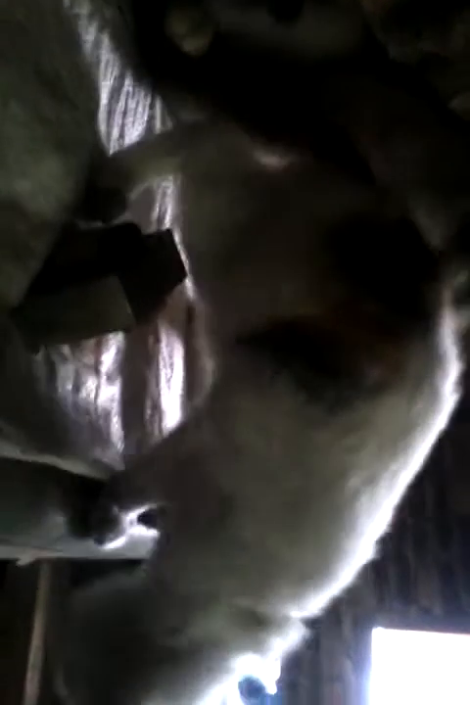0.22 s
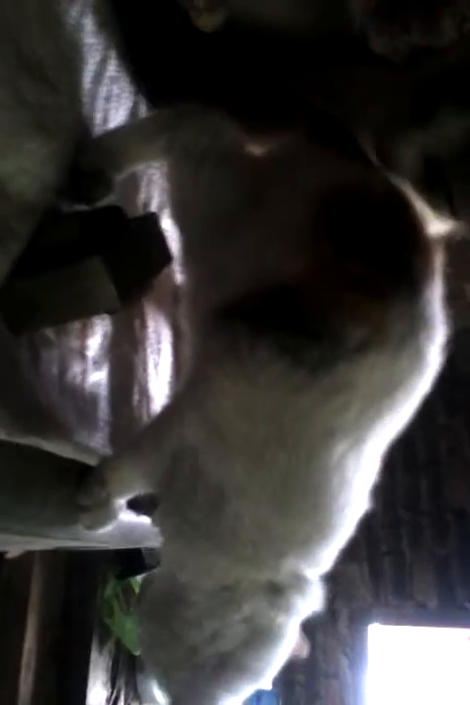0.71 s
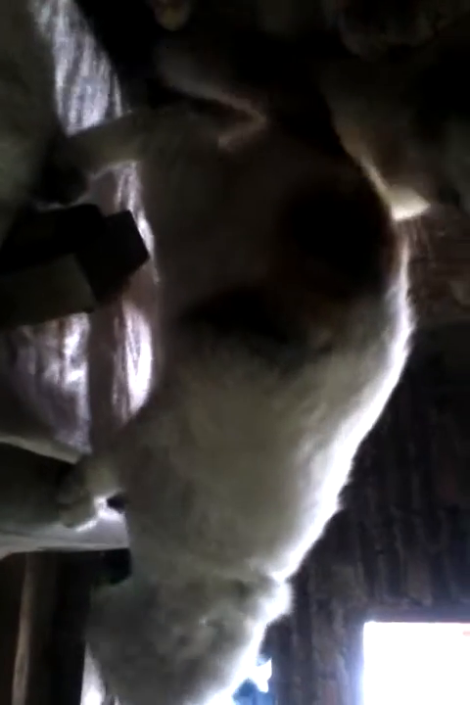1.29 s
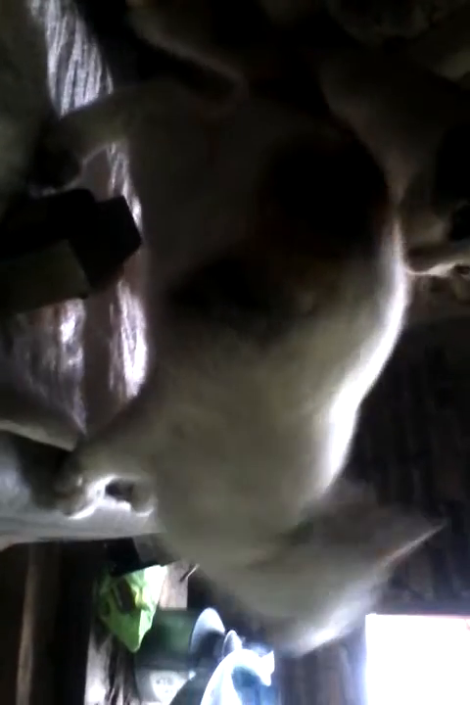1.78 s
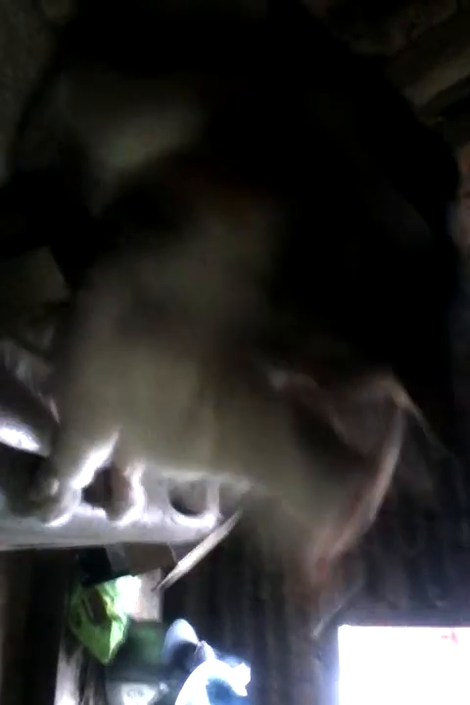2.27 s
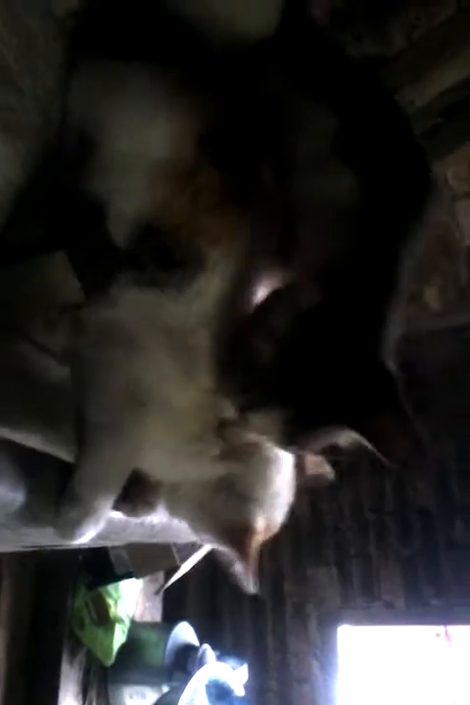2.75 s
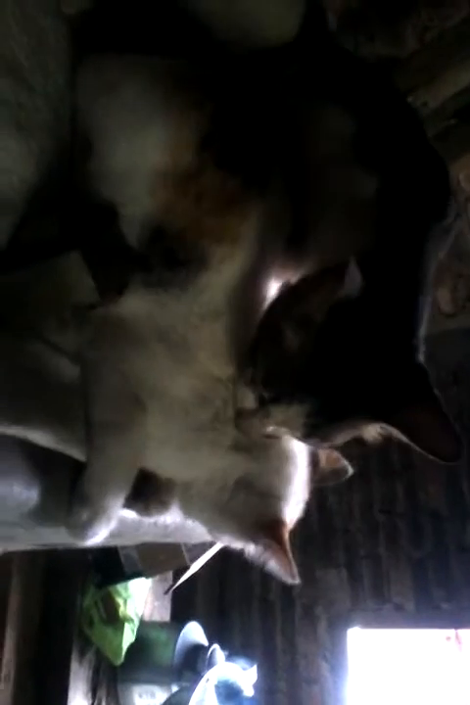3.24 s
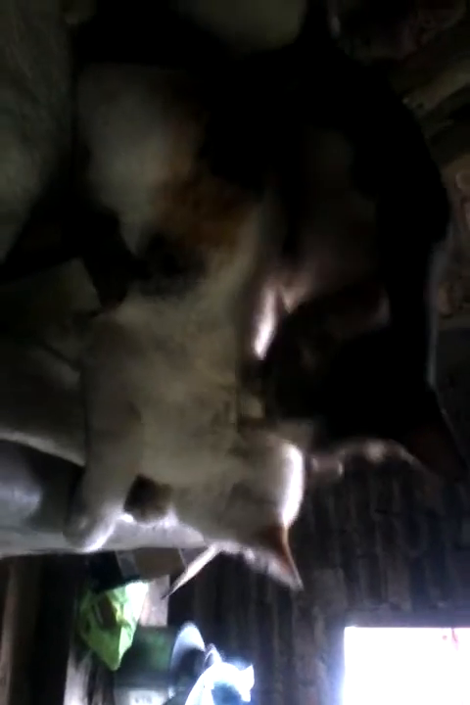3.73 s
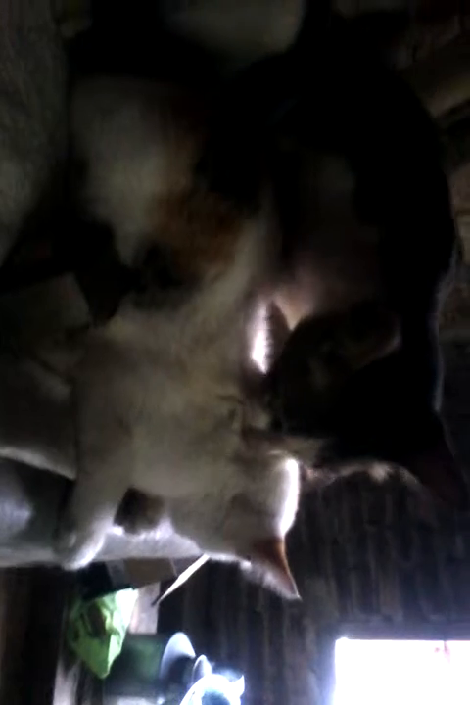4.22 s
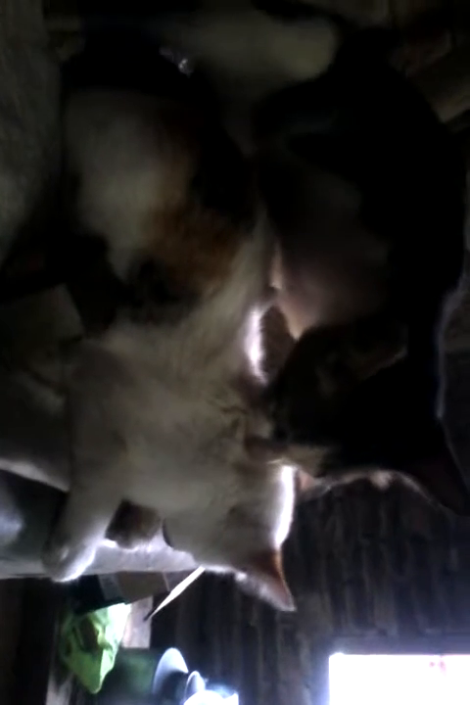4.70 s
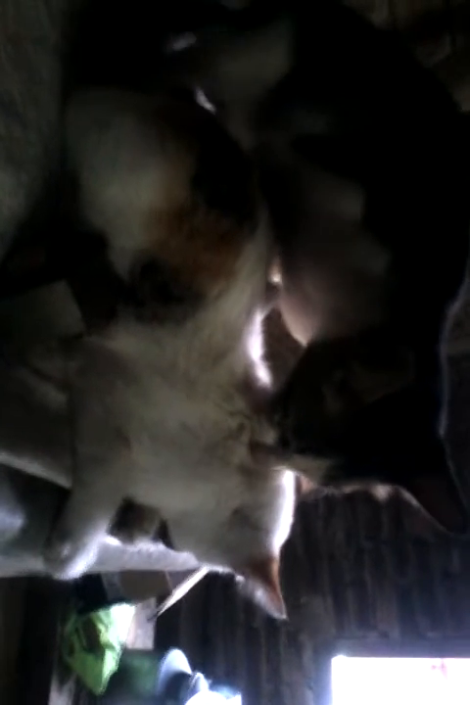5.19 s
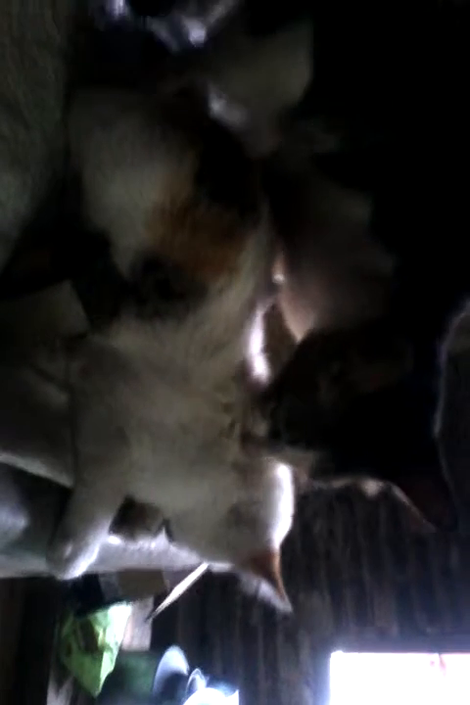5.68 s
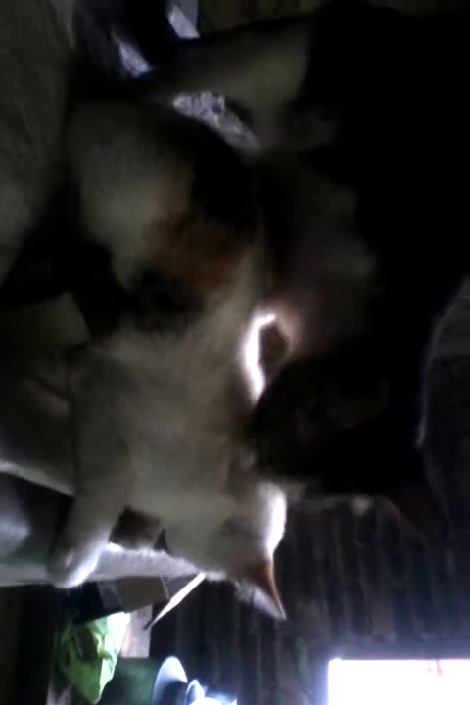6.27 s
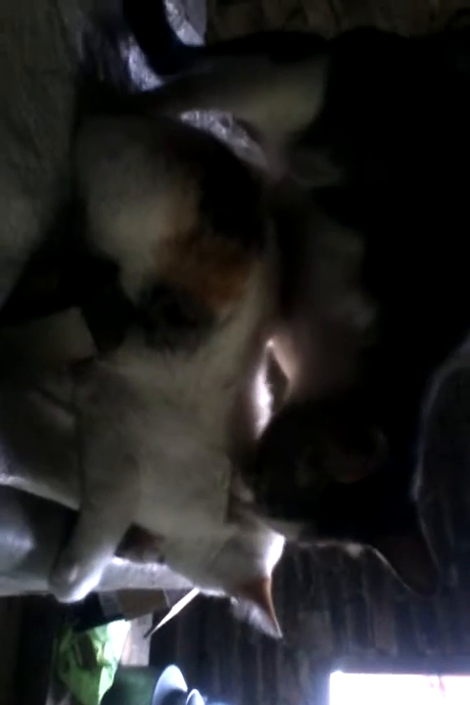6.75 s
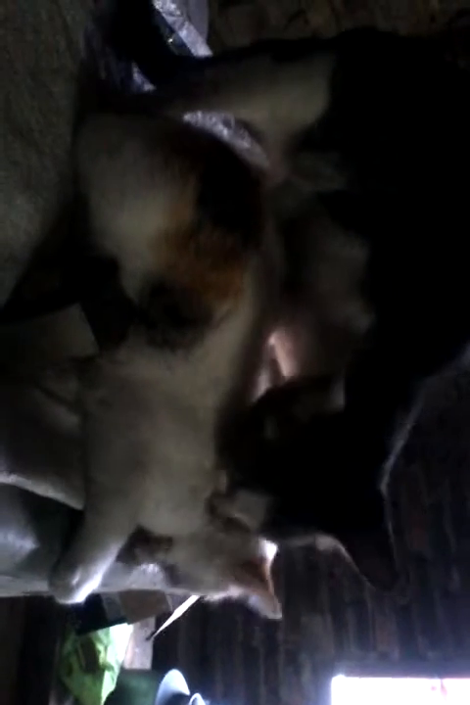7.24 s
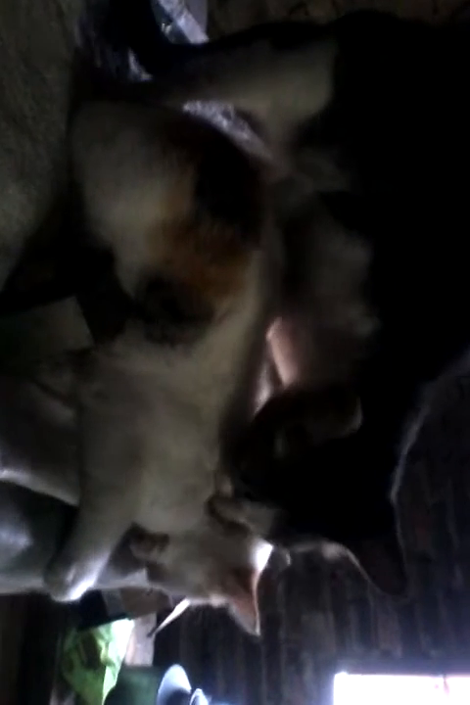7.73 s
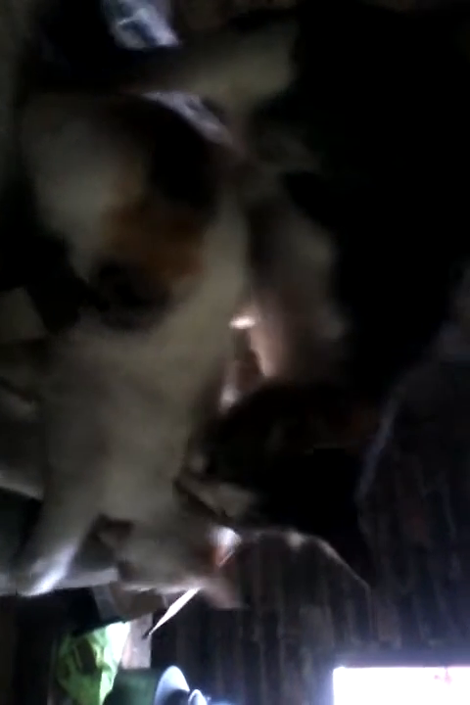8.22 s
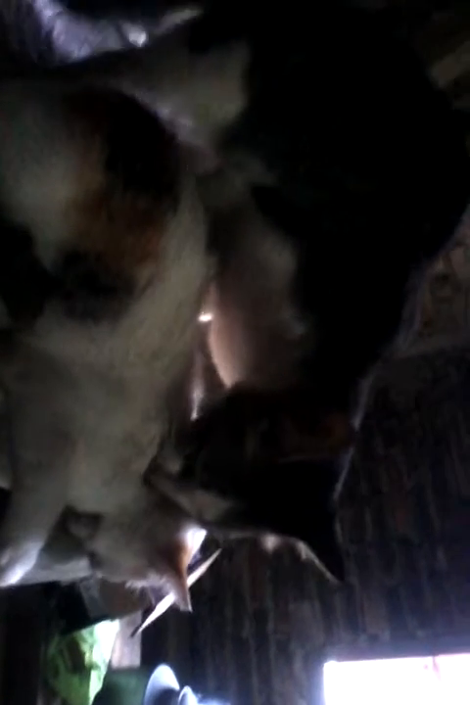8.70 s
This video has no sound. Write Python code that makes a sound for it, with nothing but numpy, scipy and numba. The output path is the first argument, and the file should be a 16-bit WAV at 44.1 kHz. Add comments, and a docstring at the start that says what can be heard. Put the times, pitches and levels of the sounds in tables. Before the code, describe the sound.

Two cats face off close to the microphone in a small room. One starts with a stuttering nasal hum that swells into a loud, wavering, raspy yowl. Much quieter closed-mouth moans follow, with a short spit early on and a faint hiss later. The moans glide up and down, cracking and crumbling into growls. A few tiny ticks and a faint room rumble lie underneath.

```python
"""Two cats face off close by in a small room. First, one swells from a stuttering nasal hum into a loud,
wavering, raspy yowl, its vocal folds ringing through nose, throat and opening mouth. Low closed-mouth
moans take over, with a short spit of unvoiced air at 2.3 s and a faint hiss near 4 s. The moans glide on,
cracking toward the octave below and crumbling into growls where the pitch sinks. A few small ticks and a
faint room rumble lie underneath; a low hum creeps up at the end."""
import sys
import numpy as np
from scipy import signal
from scipy.fft import rfft, irfft
from scipy.io import wavfile
from scipy.ndimage import uniform_filter1d
from numba import njit

SR = 44100
rng = np.random.default_rng(int(sys.argv[2]) if len(sys.argv) > 2 else 0)


def to_wav(s):
    """Save 16-bit WAV."""
    ch = np.atleast_2d(s).T  # columns
    pcm = np.round(np.clip(ch, -1, 1) * 32767)  # PCM
    wavfile.write(sys.argv[1], SR, pcm.astype(np.int16))


N = 395136
TIME = np.arange(N) / SR

# the yowl's melody, two arches: time_s, pitch_hz
YOWL_PITCH = [(.43, 334.6), (.57, 361.7), (.585, 383), (.86, 394.4), (1.014, 467.5), (1.08, 471.7),
              (1.144, 424), (1.224, 416.2), (1.26, 467), (1.366, 497.3), (1.46, 498.3), (1.506, 518.6),
              (1.564, 428.6), (1.612, 428), (1.64, 367)]
# the voice catches and its pitch dips for an instant: time_s
CATCHES = [.897, .932, .976, 1.147, 1.283, 1.335, 1.386, 1.455]
# effort steps from murmur to hum to full cry: time_s, level_db
YOWL_EFFORT = [(.41, -70), (.575, -56.5), (.59, -48), (.853, -39), (.88, -27.5), (.925, -26), (.965, -28),
               (1.02, -23.5), (1.58, -22.5), (1.618, -31.5), (1.644, -46.5)]
# pushes on top of that effort: time_s, boost_db, half_width_s
SURGES = [(1.062, 13.5, 0.036), (1.189, 7.5, 0.03), (1.389, 7.5, .045), (1.506, 14, .026)]
# the nasal hum, ducking while the jaw is wide: time_s, level_db
NASAL_LEVEL = [(0.41, -64.5), (0.568, -48), (0.582, -39), (0.981, -31.5), (1.096, -49), (1.128, -36.5),
               (1.196, -40), (1.23, -59), (1.32, -64), (1.626, -31.5), (1.645, -47)]
# the jaw stretches the mouth's resonances: time_s, frequency_ratio
JAW = [(.85, 0.66), (.885, 0.73), (.961, 0.82), (1.0, 0.93), (1.06, 1.094), (1.13, 0.91), (1.2, 0.91),
       (1.35, 1.1), (1.57, 1.036), (1.63, 0.94)]
# resonances of the yowling cat's airway: centre_hz, width_hz, gain_db
NOSE_MODES = [(400, 170, 0)]
NOSE_RING_MODES = [(2430, 200, -2), (2660, 150, -0.5), (3780, 230, -5)]
THROAT_MODES = [(955, 160, 0.00018)]
PHARYNX_MODES = [(1600, 140, -7)]
MOUTH_MODES = [(2003, 690, 1), (2278, 430, 0.97)]
SHRILL_MODES = [(6220, 1900, -5), (6580, 520, -0.5)]
# the sharp edge, one resonance climbing as the lips draw back: time_s, centre_hz
EDGE_SWEEP = [(1.0, 3800), (1.12, 4300), (1.25, 4050), (1.45, 4450)]
# the shrill top flares on the two crests of the cry: time_s, level_db
SHRILL_LEVEL = [(.93, -70), (1.005, -50), (1.05, -24), (1.085, -22.5), (1.12, -36), (1.24, -42), (1.3, -55),
                (1.42, -37), (1.468, -49), (1.502, -26), (1.53, -37.5), (1.58, -38.5), (1.645, -66.5)]
# the voice frays and air tears through: time_s, half_width_s, extra_roughness, air_db, air_hz
FRAYS = [(.65, .06, 0.18, -61, 1400), (.868, .007, 0.06, -39.5, 1820), (1.07, .022, 0, -21, 3500),
         (1.225, .025, 0.04, -33, 2600), (1.392, .02, .04, -31.5, 3900), (1.522, .016, 0, -20.5, 4250),
         (1.555, .04, .13, -27, 2900)]
# low flutter under the yowl: time_s, level_db
FLUTTER_LEVEL = [(0.52, -54), (0.966, -57.5), (1.07, -38), (1.096, -48.5), (1.246, -40.5), (1.88, -66.5)]

# one glide per moan, with levels ahead of the moans' mix gain: start_s, length_s, attack_s, release_s,
# first_hz, last_hz, nose_db, mouth_db, level_change_db, roughness
MOANS = [(1.652, 0.29, 0.0064, 0.066, 440.7, 472, -79, -56.5, -17, 0.29),
         (2.1, 0.11, 0.023, 0.051, 465, 418, -75, -59.5, -4.5, 0.4),
         (2.4, 0.77, 0.053, 0.041, 537, 543.4, -85, -78, -1.5, 0),
         (3.373, 0.085, 0.051, 0.021, 264.2, 303.6, -67.5, -61.5, -0.5, 0.01),
         (3.453, 0.098, 0.038, 0.027, 361.6, 490.4, -75, -64.5, 2.5, 0.15),
         (3.568, 0.2, 0.067, 0.069, 399, 470.1, -89, -67, 4, 0.14),
         (3.8, 0.33, 0.05, 0.03, 636, 606, -75, -69.5, 2.5, 0.02),
         (4.19, 0.14, 0.077, 0.028, 587, 571, -63.5, -79.5, 1, 0.03),
         (4.285, .11, 0.038, .025, 591, 560, -71.5, -63.5, -5, 0.01),
         (4.36, 0.055, 0.019, 0.026, 564, 512.7, -60, -71.5, -8, 0.08),
         (4.378, 0.31, 0.021, 0.017, 510, 499, -73.5, -68.5, 11, 0.01),
         (4.658, 0.29, 0.0058, 0.03, 481.2, 404, -54.5, -50.5, -7, 0.02),
         (4.883, 0.18, .025, 0.034, 402.2, 324.2, -59, -51, -1, 0.19),
         (5.035, 0.28, 0.029, 0.16, 345.2, 149, -52, -53, -10, 0.2),
         (5.893, 0.055, 0.015, 0.027, 240.9, 229.7, -63.5, -66.5, 2, 0.25),
         (5.92, 0.13, 0.048, 0.047, 255.4, 350, -55.5, -97, 1.5, 0.09),
         (5.988, .24, 0.026, 0.048, 314, 556.6, -63.5, -57.5, -5.5, 0.12),
         (6.401, 0.14, 0.051, 0.032, 538.7, 513, -66, -61, -1, 0.16),
         (6.498, .2, 0.042, 0.048, 548, 492.4, -72, -58, -0.5, 0.18),
         (6.663, 0.23, 0.045, 0.036, 596.4, 616.4, -68, -64, 0, 0.29),
         (6.887, .13, 0.047, 0.056, 519.3, 485.4, -70, -63.5, 3.5, 0.29),
         (6.986, .21, 0.072, 0.12, 487, 315.4, -55.5, -59.5, 11, 0.15),
         (7.725, 0.043, 0.013, 0.018, 220.2, 203.5, -57, -62.5, -2, 0.2),
         (7.75, 0.17, .03, 0.043, 206, 364, -61, -56, 18, 0.1),
         (7.898, 0.16, 0.075, 0.1, 357.3, 548.5, -70, -52.5, -7, 0.15)]
# the thin whine swells for a moment: time_s
WHINE_SWELLS = [2.81, 3.05, 4.04]
# the voice cracks toward the octave below as cycles alternate strong and weak: time_s, depth
CRACKS = [(3.5, 0.09), (4.07, 1), (4.15, 0.05), (6.35, 0.11), (6.45, 0.93), (6.94, 0.72), (7.0, 0.02)]
# the moaning cat's lips part briefly and lift the mouth's resonance: time_s, frequency_ratio
LIPS = [(2.2, 1.04), (2.6, 1.52), (3.1, 1.36), (3.3, 1.04), (4.0, 0.86), (4.35, 1.513), (4.75, 1.29),
        (4.98, 0.88)]
# resonances with the mouth nearly closed: centre_hz, width_hz, gain_db
MOAN_NOSE_MODES = [(260, 190, 14.5), (433, 242, 15.5)]
MOAN_MOUTH_MODES = [(836.5, 470, 1)]

# envelopes of the spit and the faint later hiss: time_s, level_db
SPIT_LEVEL = [(2.27, -66), (2.315, -40.5), (2.345, -42.5), (2.41, -63)]
HISS_LEVEL = [(3.88, -77.5), (3.97, -62.5), (4.15, -78)]
# their tone colours: frequency_hz, relative_db
SPIT_COLOUR = [(200, -27), (1600, -1.5), (3400, -15), (4300, -27), (9000, -39)]
HISS_COLOUR = [(1200, -47), (1590, 0), (2300, -40)]
# small ticks, scratches and a short rustle: start_s, peak_db, ring_hz, width_hz, decay_s
TICKS = [(1.658, -43.5, 2070, 910, 0.075), (1.755, -44, 3220, 343, 0.042), (3.514, -51, 3114, 450, 0.011),
         (3.906, -42, 4080, 603, 0.0036), (5.111, -51.5, 1784, 1002, 0.0054),
         (5.229, -57, 2300, 600, 0.0099)]
# colour of the room tone: frequency_hz, relative_db
ROOM_COLOUR = [(25, -24.5), (86, -29), (129, -4), (350, -11.5), (652, -12.5), (1160, -22.5), (6000, -27.5),
               (9000, -34.5)]
# envelopes of the room tone and its low hum: time_s, level_db
ROOM_LEVEL = [(2.3, -62.5), (4.5, -69.5), (7.3, -66), (8.2, -68)]
HUM_LEVEL = [(6.8, -83), (7.3, -80.5), (8.3, -70.5)]

THROAT_BEST_HZ = 441  # the note that suits the throat best
YOWL_CLEAR_HZ, MOAN_CLEAR_HZ = 421.4, 418  # below these, the voices roughen


def yowl(nose_ring_db=-26.5, throat_follow=0.98, mouth_top_hz=2840):
    """The lead voice: a hum leaves by the nose; as the jaw opens, the mouth's resonances take over."""
    jaw, = curves(JAW)
    hz, rough = yowl_melody()
    throat_gain, mouth_gain, edge_gain, nose_gain = yowl_dynamics(hz, jaw)
    folds = larynx(hz, rough, split=0, jitter=.13, shimmer=.9, air=1.0, softness=0.62, harmonics=17)
    nose = steady(resonate(folds, NOSE_MODES))
    nose += undb(nose_ring_db) * steady(resonate(folds, NOSE_RING_MODES))
    throat = steady(resonate(folds, THROAT_MODES, (hz / THROAT_BEST_HZ) ** throat_follow))
    # the closing of the folds trembles, which shakes mostly the overtones
    tremble = undb(1.9 * wander(55))
    # a narrow mouth rings more sharply
    ring = sum(resonate(folds, [mode], jaw, jaw ** 3) * undb(2.3 * wander(55)) for mode in MOUTH_MODES)
    ring += resonate(folds, PHARYNX_MODES)
    mouth = steady(signal.sosfilt(signal.butter(8, mouth_top_hz, fs=SR, output="sos"), ring))
    rasp = folds + 2 * rough * noise()  # turbulence at the teeth
    overtones = mouth_gain * mouth + edge_gain * sharp_edge(rasp) + shrill_top(rasp)
    return nose_gain * nose + throat_gain * throat + tremble * overtones + torn_air(folds) + flutter()


def yowl_melody(catch_depth=.035, catch_half_width_s=.006):
    """Pitch and roughness: the folds catch, fray, and rasp as they slacken."""
    hz, = curves(YOWL_PITCH)
    hz *= 1 - catch_depth * sum(bump(s, catch_half_width_s) for s in CATCHES)
    fray = sum(extra * bump(s, width) for s, width, extra, _, _ in FRAYS)
    return hz, 0.11 + fray + slack(hz, YOWL_CLEAR_HZ, per_octave=0.84)


def yowl_dynamics(hz, jaw, stutter_db=5, stutter_hz=41.5, jaw_open=.89):
    """Gains of throat, mouth, edge and nose; effort and its surges drive the first three."""
    effort_db, = curves(YOWL_EFFORT)
    nose_db, = curves(NASAL_LEVEL)
    surge_db = sum(db * bump(s, width) for s, db, width in SURGES)
    # the throat's tone follows the effort, takes a share of each push and weakens above its best note
    throat_db = effort_db - 5.5 + 0.23 * surge_db
    throat_db -= 33.5 * np.maximum(np.log2(hz / THROAT_BEST_HZ), 0)
    mouth_db = effort_db + surge_db
    edge_db = mouth_db - 18 + 70.5 * np.minimum(jaw - jaw_open, 0)  # a narrow jaw muffles the edge
    # the hum stutters as it sets in
    stutter = stutter_db * bump(.64, 0.094) * np.cos(2 * np.pi * stutter_hz * (TIME - .64))
    return [gate(YOWL_EFFORT) * undb(db + stutter) for db in (throat_db, mouth_db, edge_db, nose_db)]


def larynx(hz, rough, split, jitter, shimmer, air, softness, harmonics):
    """Vocal-fold pulses, uneven in length and size when rough; air puffs through once a cycle."""
    unsteady_hz = hz * (1 + jitter * rough * wander(190) + 0.0095 * wander(42))
    phase = 2 * np.pi * np.cumsum(unsteady_hz) / SR
    # softly closing folds have weaker overtones
    pulses = unit(sum(np.cos(k * phase) / k ** softness for k in range(1, harmonics + 1)))
    size = np.exp(shimmer * rough * wander(90)) * (1 + split * np.cos(phase / 2))
    return pulses * size + air * rough * noise() * (1 + np.cos(phase))


def slack(hz, clear_hz, per_octave):
    """Roughness of the folds as they slacken below their clear range."""
    return per_octave * np.maximum(np.log2(clear_hz / hz), 0)


def sharp_edge(rasp, width_hz=950):
    """The cry's bite: one steep resonance that climbs as the lips draw back."""
    centre_hz, = curves(EDGE_SWEEP)
    for _ in range(4):
        rasp = moving_band(rasp, centre_hz, np.full(N, float(width_hz)))
    return steady(rasp)


def shrill_top(rasp, flicker_db=3):
    """The airway's highest resonances sway raggedly together, and each flickers alone."""
    sway = 1 + .025 * wander(67)
    ring = sum(steep(rasp, [mode], sway) * undb(flicker_db * wander(24)) for mode in SHRILL_MODES)
    return envelope(SHRILL_LEVEL) * undb(flicker_db * wander(60)) * steady(ring)


def torn_air(folds, width_ratio=0.75):
    """Bursts of turbulence, pulsing with the folds, where the voice frays."""
    air = noise() * (1 + np.abs(folds))
    return sum(undb(db) * bump(s, half_width) * unit(steep(air, [(hz, width_ratio * hz, 0)]))
               for s, half_width, _, db, hz in FRAYS)


def flutter():
    """Two low bands of noise flutter under the cry."""
    return envelope(FLUTTER_LEVEL) * unit(resonate(noise(), [(152, 40, -4.5), (220, 98, -11.5)]))


def moans(lips_close_hz=394, rumble_db=-13, breath_db=-18):
    """Soft glides of few overtones behind closed jaws, crumbling into a growl where the pitch sinks."""
    hz, rough, nose_gain, mouth_gain = moan_phrasing()
    # on low notes the lips close further and their resonance sinks with the voice
    lips = curves(LIPS)[0] * np.minimum(hz / lips_close_hz, 1) ** 0.24
    split, = curves(CRACKS)
    folds = larynx(hz, rough, split, jitter=0.27, shimmer=1.0, air=2.4, softness=1.32, harmonics=5)
    muffled = steep(folds, MOAN_MOUTH_MODES, lips)  # the narrow gap between the lips passes one band
    voice = nose_gain * steady(resonate(folds, MOAN_NOSE_MODES)) + mouth_gain * steady(muffled)
    rumble = undb(rumble_db) * nose_gain * unit(resonate(noise(), [(196, 380, 0)]))
    waver = undb(2.37 * wander(20.8))
    breath = undb(breath_db) * mouth_gain * noise()
    return voice * waver + rumble + breath


def moan_phrasing(whine_db=12):
    """Pitch, roughness and the gains of nose and mouth: each moan swells, glides and dies away."""
    pitch = np.full(N, float(MOAN_CLEAR_HZ))
    rough, nose, mouth = np.zeros((3, N))
    for start, length, attack, release, first_hz, last_hz, nose_db, mouth_db, change_db, grit in MOANS:
        age = TIME - start
        along = np.clip(age / length, 0, 1)
        hz = first_hz + (last_hz - first_hz) * along ** 1.45  # glides speed up as they go
        ramp = np.clip(np.minimum(age / attack, (length - age) / release), 0, 1)
        swell = ramp * undb(change_db * (along - .5))
        # as a moan climbs, its sound moves from the nose to the lips
        octaves = np.log2(hz / np.sqrt(first_hz * last_hz))
        by_nose = swell * undb(nose_db - 6 * octaves)
        by_mouth = swell * undb(mouth_db + octaves)
        # where two moans meet, the stronger has the folds
        leads = by_nose + by_mouth > nose + mouth
        pitch, rough = np.where(leads, hz, pitch), np.where(leads, grit, rough)
        nose, mouth = np.maximum(nose, by_nose), np.maximum(mouth, by_mouth)
    mouth *= undb(whine_db * sum(bump(s, 0.045) for s in WHINE_SWELLS))
    return pitch, rough + slack(pitch, MOAN_CLEAR_HZ, per_octave=0.17), nose, mouth


def hisses():
    """A spit, then a faint hiss: air forced through the open mouth without voice."""
    spit = envelope(SPIT_LEVEL) * coloured(SPIT_COLOUR) * undb(wander(89))
    return spit + envelope(HISS_LEVEL) * coloured(HISS_COLOUR)


def ticks():
    """Tiny contacts, each a fading scratch in one resonance."""
    out = np.zeros(N)
    for start, peak_db, hz, width, decay in TICKS:
        age = TIME - start
        scratch = noise() * (age > 0) * np.exp(-np.abs(age) / decay)
        tick = resonate(scratch, [(hz, width, 0)])
        out += undb(peak_db) * tick / np.abs(tick).max()
    return out


def reflections(x, t60_s=0.16, wet_db=-20):
    """The short reverb tail of a cluttered room."""
    age = TIME[:SR // 2]
    tail = rng.standard_normal(len(age)) * undb(-60 * age / t60_s) * (age > .003)
    return undb(wet_db) * signal.fftconvolve(x, tail / np.sqrt(np.sum(tail ** 2)))[:N]


def room_tone(hum_hz=134):
    """A bed of dull room noise with a narrow, wavering hum."""
    air = coloured(ROOM_COLOUR) * undb(curves(ROOM_LEVEL)[0])
    hum = np.sin(2 * np.pi * np.cumsum(hum_hz + 3 * wander(10)) / SR)
    return air + unit(hum) * undb(curves(HUM_LEVEL)[0] + 2 * wander(6.8))


def undb(db):
    return 10 ** (np.asarray(db) / 20)


def unit(x):
    return x / np.sqrt(np.mean(x ** 2))


def noise():
    return rng.standard_normal(N)


def curves(table):
    """Each column of a table of timed rows, at every sample."""
    times, *columns = np.transpose(table)
    return [np.interp(TIME, times, column) for column in columns]


def gate(table, fade_s=0.0093):
    """Open between a table's first and last row, fading shut outside."""
    first, last = table[0][0], table[-1][0]
    return np.interp(TIME, [first - fade_s, first, last, last + fade_s], [0, 1, 1, 0])


def envelope(table):
    """Gated gain from rows of time_s, level_db."""
    return gate(table) * undb(curves(table)[0])


def bump(time_s, half_width_s):
    """A smooth swell of height 1."""
    return np.exp(-((TIME - time_s) / half_width_s) ** 2)


def wander(hz):
    """Smooth random drift of spread 1, changing up to hz times a second."""
    return unit(signal.sosfilt(signal.butter(4, hz, fs=SR, output="sos"), noise()))


def coloured(points):
    """Noise shaped by rows of frequency_hz, relative_db."""
    hz, db = np.transpose(points)
    bins_hz = np.maximum(np.fft.rfftfreq(N, 1 / SR), 1)
    colour = undb(np.interp(np.log(bins_hz), np.log(hz), db))
    return unit(irfft(rfft(noise()) * colour, N))


def steady(x, window=1100):
    """The same sound with its short-term level held at 1."""
    power = uniform_filter1d(uniform_filter1d(x ** 2, window), window // 2)
    return x / np.sqrt(np.abs(power) + 1e-12)


def resonate(x, modes, stretch=1, damping=1):
    """Parallel resonances (centre_hz, width_hz, gain_db), each two band-passes in series."""
    out = 0
    for hz, width, db in modes:
        centre, band = hz * stretch * np.ones(N), width * damping * np.ones(N)
        out = out + undb(db) * moving_band(moving_band(x + 1e-18, centre, band), centre, band)
    return out


def steep(x, modes, stretch=1):
    """Two passes through the resonances, for steeper skirts."""
    return resonate(resonate(x, modes, stretch), modes, stretch)


@njit
def moving_band(x, hz, width):
    """State-variable band-pass whose centre can move every sample."""
    out, band_state, low_state = np.empty(len(x)), 0., 0.
    for i in range(len(x)):
        tuning, damping = np.tan(np.pi * hz[i] / SR), width[i] / hz[i]
        band = (band_state + tuning * (x[i] - low_state)) / (1 + tuning * (tuning + damping))
        band_state = 2 * band - band_state
        low_state += 2 * tuning * band
        out[i] = damping * band
    return out


def low_pass(x, hz):
    """A steep cut of the treble."""
    return signal.sosfilt(signal.ellip(8, .2, 70, hz, fs=SR, output="sos"), x)


def scene():
    """The mono mix: cats and ticks up front, their reflections and the room tone behind."""
    close = yowl() + undb(2.0) * moans() + hisses() + ticks()
    return (close + reflections(close) + room_tone())[None]


def record(dry):
    """A narrow-band recorder rounds off the loudest peaks and leaks a faint mirror of its top octave."""
    ceiling, knee = .74, 10
    rounded = dry[0] / (1 + (dry[0] / ceiling) ** knee) ** (1 / knee)
    band = low_pass(rounded, hz=7300)
    mirror = resonate(band * np.cos(2 * np.pi * 16000 * TIME), [(9200, 1200, 0)])
    return low_pass(band + undb(-17.5) * mirror, hz=9700)[None]


dry = scene()
out = record(dry)
to_wav(out)
```